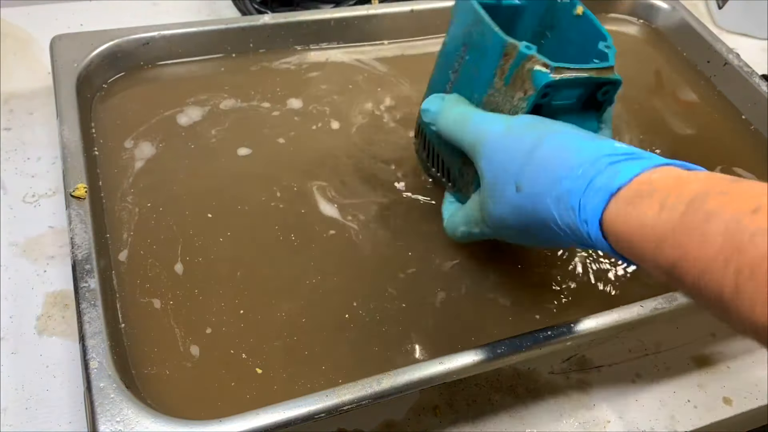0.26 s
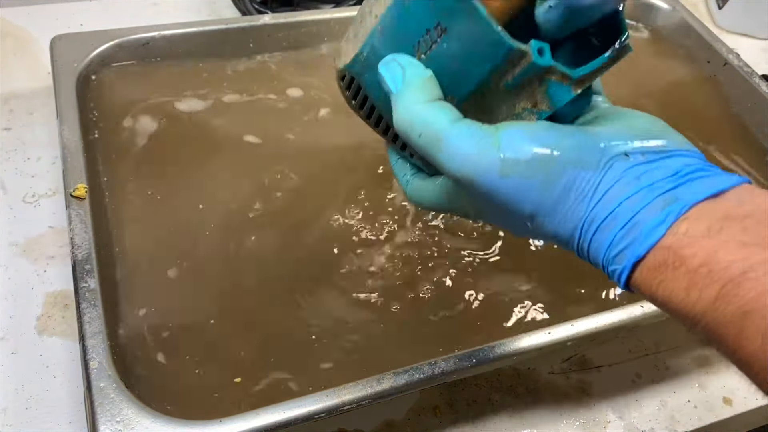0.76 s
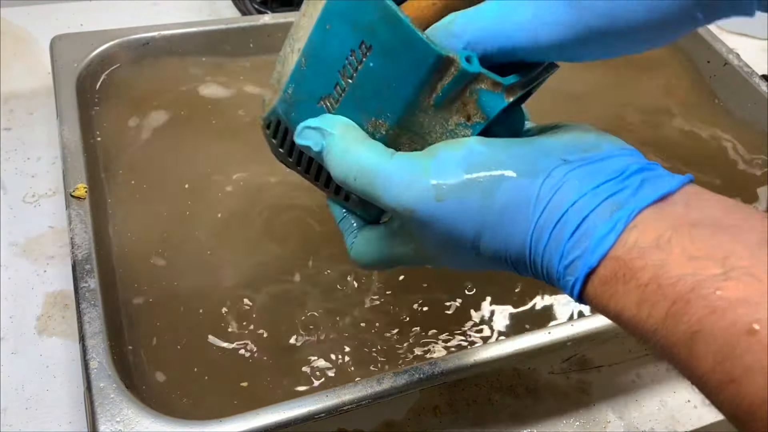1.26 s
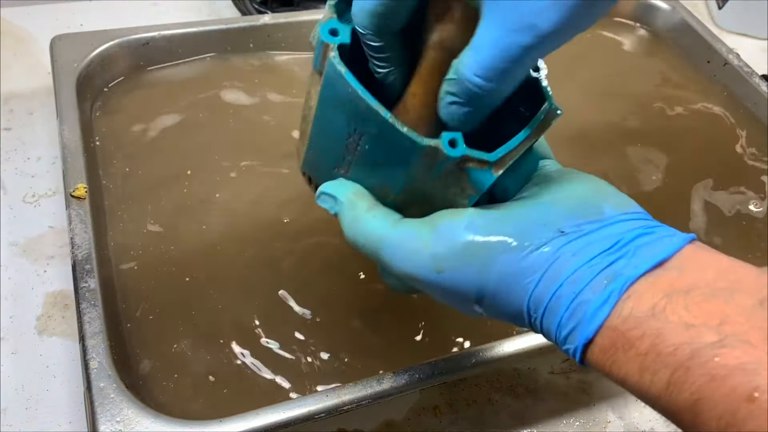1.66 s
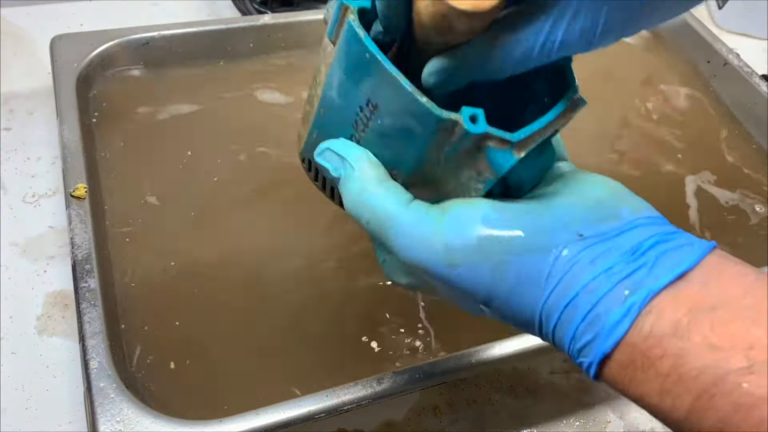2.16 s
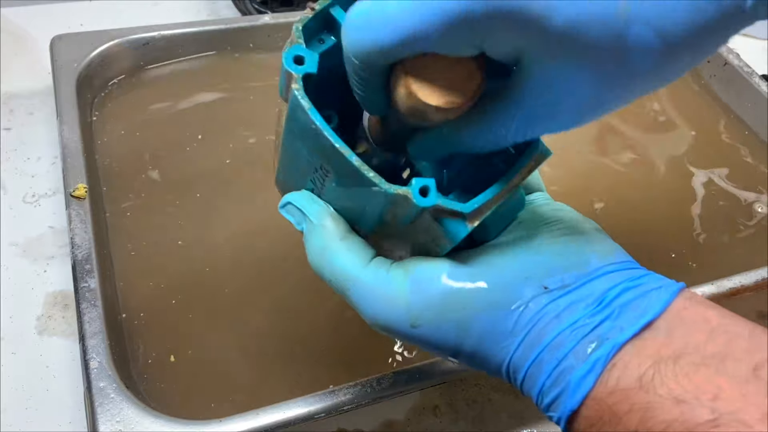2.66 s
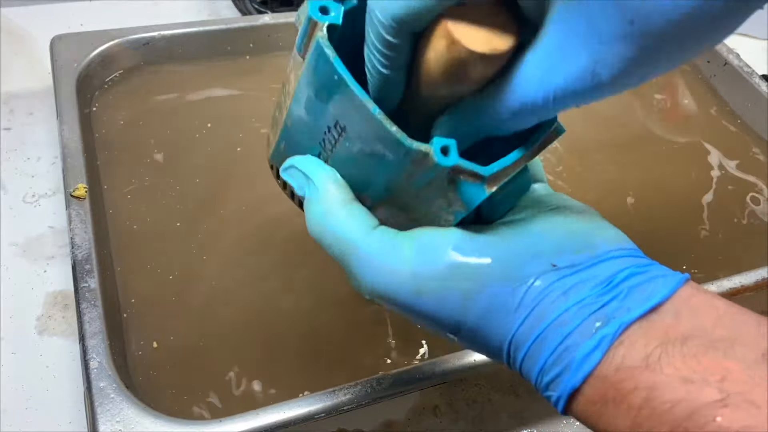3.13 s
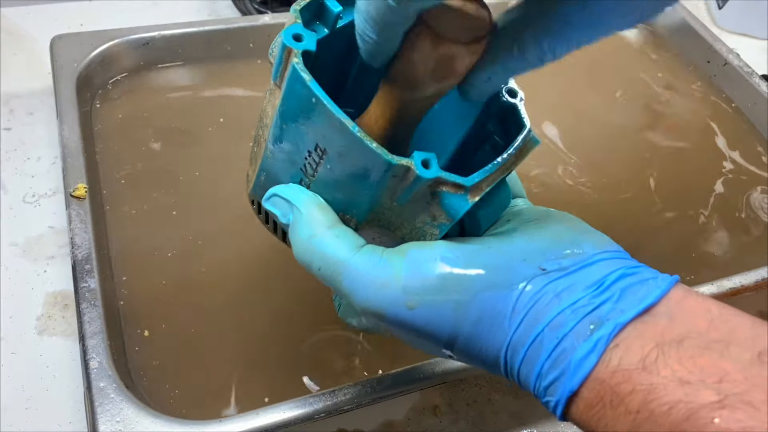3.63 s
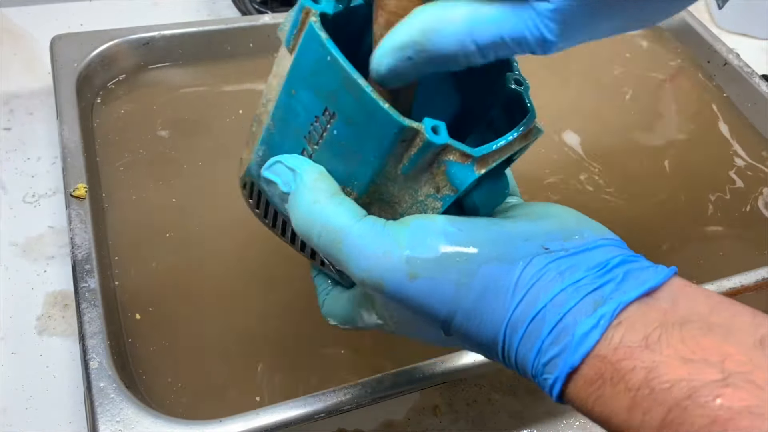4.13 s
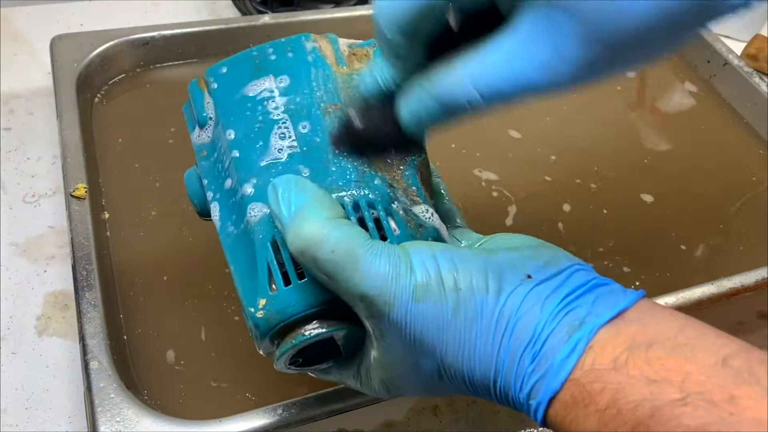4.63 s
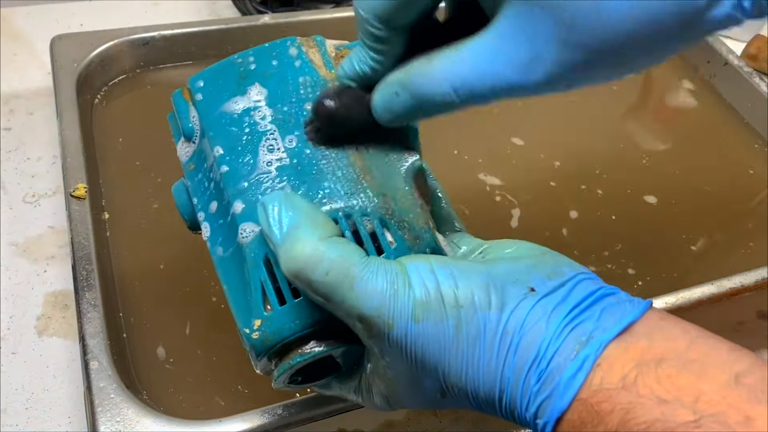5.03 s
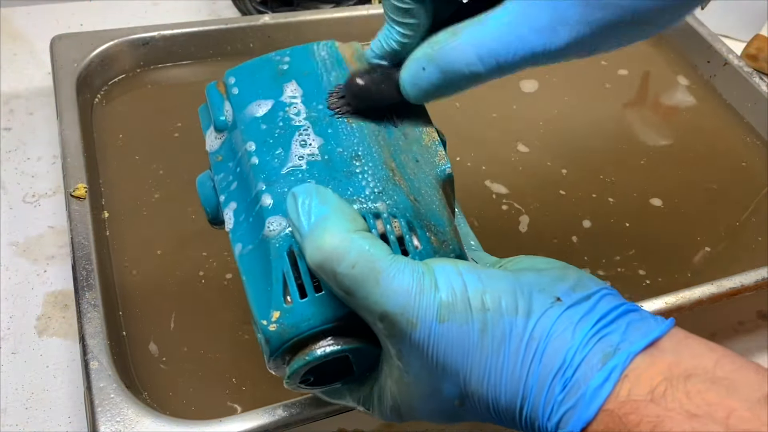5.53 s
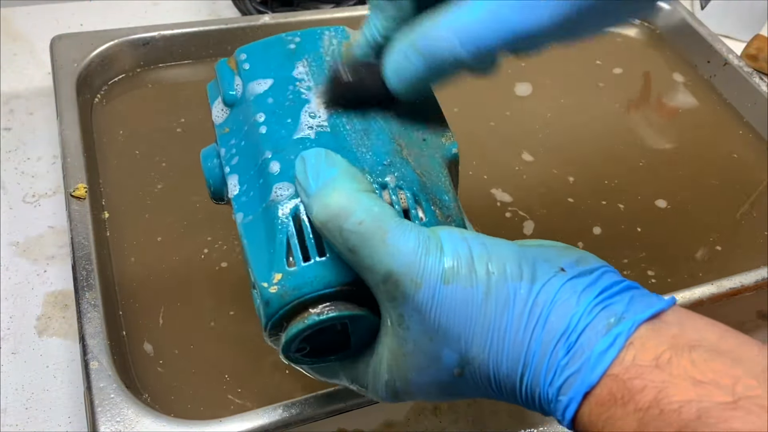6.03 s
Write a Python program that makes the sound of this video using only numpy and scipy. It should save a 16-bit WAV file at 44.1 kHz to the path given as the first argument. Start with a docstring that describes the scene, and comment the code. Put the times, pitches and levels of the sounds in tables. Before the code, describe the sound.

Close stereo pickup in a small hard room with a faint low hum. A hollow plastic housing clacks into a steel tray of water with a low boom and slosh, lifts out gurgling and dripping. A wet brush scrapes inside, its metal collar knocking the walls in short hollow clacks. After a quieter moment, brisk regular bristle strokes scrub the outside to the end.

```python
"""Small hard room with a low hum, heard at close range by two microphone ports.
A hollow plastic housing is dunked in a steel tray of water and lifted out, dripping: tray modes, bubbles, spray.
A wet brush works inside it: gritty bristle noise, and a ferrule that knocks the walls into short plastic modes.
It then scrubs the outside in quick strokes: bristle noise and wall resonances that follow the brush speed."""
import sys
import numpy as np
from scipy import signal
from scipy.fft import rfft, irfft, next_fast_len
from scipy.io import wavfile
from scipy.ndimage import uniform_filter1d

SR = 44100
rng = np.random.default_rng(int(sys.argv[2]) if len(sys.argv) > 2 else 0)


def store_pcm(level_fs):
    """Save levels as 16-bit WAV."""
    pcm = np.round(np.clip(level_fs, -1, 1) * 32767).astype(np.int16)
    wavfile.write(sys.argv[1], SR, np.atleast_2d(pcm).T)


N = 277389
TIME_S = np.arange(N) / SR
BIN_HZ = np.fft.rfftfreq(N, 1 / SR)
RING_S = np.arange(round(.3 * SR)) / SR  # time axis of one struck sound

# Background noise spectrum: freq_hz, level_db
FLOOR = [(50, -27), (105, -2.5), (260, -15.5), (340, -20.5), (1000, -34.5), (2300, -41), (7000, -38),
         (16000, -37)]
FLOOR_DB = -59.5
MAINS_HZ, MAINS_DB = 100, -67
# Rumble spectrum: freq_hz, level_db
RUMBLE = [(100, -19.5), (210, -2), (285, 2.5), (420, -20), (600, -14), (1500, -62)]
# Faint drifting tones: middle_s, half_length_s, level_db, pitch_hz, drift_hz_per_s
LOW_TONES = [(3.711, 0.056, -59, 241.5, 0), (3.856, 0.015, -54, 275, 0), (4.041, 0.19, -55.5, 179.8, -17),
             (4.19, 0.075, -61, 253.4, -330)]

# Room decay: freq_hz, t60_s
ROOM_DECAY = [(100, 0.36), (1500, 0.29), (8000, 0.32), (16000, 0.02)]
# Port phase: freq_hz, left_lead_rad
LEFT_LEAD = [(300, 0.63), (690, 0.78), (2150, 1.17), (3400, 1.5), (8000, 1)]
# Port level: freq_hz, left_minus_right_db
LEFT_LEVEL = [(600, -3), (2000, 0.5), (8000, 5), (13000, 3)]
PORT_LIKENESS = 0.92  # limit of the common power share toward high treble
LIMITER_CEILING, BAND_EDGE_HZ = .9, 16250

# Plunge into the tray
DUNK_S, DUNK_DB = .1455, -21
BOOM_HZ, BOOM_DB, BOOM_RISE_S, BOOM_T60_S = 239.3, -22.5, 0.015, 0.14
# Struck tray modes: freq_hz, level_db, t60_s
TRAY_MODES = [(770, -8, 0.03), (3850, 3, 0.02)]
# Water shoved about in the tray: freq_hz, width_hz, level_db
SLOSH = [(310, 220, 9), (570, 100, -6), (1250, 330, -10)]
# The housing breaks the surface and sucks in air
GULP_S, GULP_HALF_S, GULP_DB = .262, 0.0085, -30
# Gulp resonances: freq_hz, width_hz, level_db
GULP = [(3300, 480, 9), (1520, 700, 0.5)]

# Water thrown up by the plunge, then pouring off the lifted housing: start_s, rise_s, level_db, t60_s
GUSHES = [(0.142, 0.0021, -49.5, 0.26), (.24, 0.059, -51.5, 0.38)]
TRICKLE_DB, TRICKLE_DB_PER_S, TRICKLE_END_S = -56, -5, 1
# Drops slapping the water: start_s, level_db, pitch_hz
DROPS = [(0.231, -30.5, 1097), (0.42, -30.5, 4450), (0.477, -25.5, 5160), (0.541, -33, 2110),
         (0.559, -37, 2600), (0.621, -28.5, 7100), (0.667, -31, 6300), (0.784, -28, 3025),
         (0.7848, -31, 2350), (0.837, -25, 7380)]
# Bubbles welling up: start_s, level_db (before the chirp gain), pitch_hz
BUBBLES = [(.242, -42, 5600), (.270, -44, 1202), (.302, -39.5, 1576), (.365, -34, 3060), (0.386, -40, 3670),
           (.457, -44.5, 2500), (0.853, -40.5, 3310)]
# Spray spectrum: freq_hz, level_db
SPLASH = [(400, -18), (1400, -18), (5500, -7.5), (16000, -11.5)]

# Brush head bottoming in the housing: start_s, peak_db
THUDS = [(1.0805, -37.5), (1.384, -34), (2.095, -45.5), (2.1805, -23.5), (2.307, -37.5), (2.3577, -23),
         (2.421, -36), (2.488, -22.5), (2.6078, -23), (2.7383, -30.5)]
# Ferrule on wall: start_s, level_db, second_wall_mode_db, rim_db, hardness_db (last three relative)
KNOCKS = [(1.0802, -23, -1.5, -24, -4), (1.259, -51.5, 4, 1.5, -19), (1.385, -30, -3, -20, -11),
          (1.547, -46, -5, -3, -10), (1.713, -26.5, -2, -22, -9.5), (1.8961, -40, 5.5, 1, 11),
          (1.901, -40, -5, -4.5, 12.5), (1.9609, -28, -4.5, -13, -2), (2.1802, -33, -5, 4, 5),
          (2.2556, -34, 4, -25.5, -7), (2.358, -20.5, -3.5, -33, -2), (2.4871, -20, -0.5, -23, 0),
          (2.6069, -20.5, -1, -25.5, 1), (2.7375, -31, 3, -7, 1), (2.899, -38, -6.5, -12.5, -10.5),
          (3.083, -36.5, -6, -17, -14), (3.957, -60, -2, -8, -7)]
# Rim modes: freq_hz, level_db, t60_s
RIM_MODES = [(1010, 0, .034), (658, -9, .04)]
# Main wall modes: freq_hz, level_db, t60_s
WALL_MODES = [(1425, 0, .022), (1640, 3, .008)]
# Second wall modes: freq_hz, level_db, t60_s
SECOND_WALL_MODES = [(1850, 0, .014), (2170, -15, .018)]
# Shell modes: freq_hz, level_db, t60_s
SHELL_MODES = [(3180, -3, .016), (3700, -1, .016), (4350, -7, .012), (5060, -12, .011), (5500, -8, .009),
               (6600, 0, .007), (6950, -3, .007), (8600, -8, .009), (9600, -6, .008)]
# Walls ring longer near the free rim: rim share deep inside, and the rise that doubles the ring
DEEP_RIM_DB, RIM_DB_PER_DOUBLING = -26, 25
CRUSH_DB, CRUSH_S = -17, .007  # bristles crushed just before a knock

# Free sweeps inside the housing: middle_s, half_length_s, level_db
SWEEPS = [(.922, 0.0088, -43), (1.225, 0.032, -50.5), (1.478, 0.0095, -46.5), (2.094, 0.0093, -41.5),
          (2.862, 0.017, -47), (3.2, 0.04, -52), (3.305, 0.03, -50.5), (3.485, 0.019, -59),
          (3.755, 0.047, -55), (3.945, 0.021, -52.5), (4.01, 0.014, -70), (4.155, 0.022, -58),
          (4.25, 0.018, -56)]
# Run-up before each knock and pull-back after it; harder knocks come from faster strokes
RUN_UP_S, RUN_UP_HALF_S, RUN_UP_DB = 0.007, 0.021, -44
PULL_BACK_S, PULL_BACK_HALF_S, PULL_BACK_DB = 0.02, 0.057, -48.5
FIRM_KNOCK_DB, SPEED_DB_PER_DB = -18, 0.32
# Bristle noise lost per dB of positive hardness: the brightest knocks have little brush noise around them
BRIGHT_KNOCK_DB_PER_DB = 4.3
CATCH_HZ, CATCH_DB = 45, 2.8
# Bristle spectrum inside: freq_hz, level_db
INSIDE_COLOUR = [(500, -1.5), (1500, -20), (2600, -1), (3700, -5.5), (5000, -0.5), (7000, -1.5),
                 (16000, -5.5)]
# Hollow-body resonances: freq_hz, width_hz, level_db
CAVITY = [(1776, 540, 3), (3680, 100, -2), (6370, 410, -1.5)]

# Outside: a dab, the tuft resting on the wall, then strokes
DAB_S, DAB_HALF_S, DAB_DB = 4.367, 0.013, -38
PAUSE_DB = -57
# Strokes, each a push and a return: start_s
STROKES = [4.463, 4.527, 4.614, 4.701, 4.786, 4.868, 4.953, 5.035, 5.123, 5.212, 5.301, 5.397, 5.485, 5.573,
           5.656, 5.747, 5.837, 5.928, 6.014, 6.104, 6.194]
LAST_STROKE_S = 0.098  # duration
FIRST_STROKE_DB, EFFORT_DB = -42.5, -39.5
TURN_DB, MID_TURN_DB = -30, -15  # speed floor; added speed, greatest at the mid-stroke turn
# Tuft slapping an edge of the housing: start_s, level_db
SLAPS = [(4.538, -32.5), (4.625, -36.5), (4.958, -44), (6.119, -37.5)]
# Brush pressure on the outer wall: time_s, level_db
PRESS = [(4.4, -14), (4.8, -10.5), (5.0, -48), (5.3, -47), (5.42, -7), (5.75, -10), (6.1, -16.5)]
# Bristle spectrum outside: freq_hz, level_db
OUTSIDE_COLOUR = [(300, -10.5), (700, -12.5), (2400, -6.5), (3600, 2), (4700, -3), (6700, 0.5), (9000, 2),
                  (16000, 5)]
# Wall resonances woken by rubbing: freq_hz, width_hz, level_db
RUB = [(670, 170, -4.5), (1042, 20, 7.5), (1386, 140, 8), (1890, 330, 3)]
# Slots in the outer wall: freq_hz, width_hz, level_db
VENTS = [(3580, 240, 0)]
RUB_SPREAD_DB = 2.8
WANDER_TOP_HZ = 9100  # colour shifts shrink above this
# Low housing modes: freq_hz, width_hz, level_db
HOLLOW = [(238, 7.7, 0), (120.2, 6.8, 0)]
# Handling spectrum: freq_hz, level_db
HANDLING = [(20, -34), (90, 15), (200, -32), (600, -39.5)]
HUM_HZ, HUM_DB = 239.7, -60


def amp(db):
    """Decibels to gain."""
    return 10 ** (np.asarray(db) / 20)


def unit(x):
    """Scales to rms 1."""
    return x / np.sqrt(np.mean(x ** 2) + 1e-20)


def read(points, hz):
    """Joins spectrum points by straight lines over log frequency."""
    point_hz, value = np.transpose(points)
    return np.interp(np.log(hz + 1), np.log(point_hz + 1), value)


def add(mix, start_s, sound):
    """Mixes a sound in place at start_s."""
    part = mix[max(round(start_s * SR), 0):][:len(sound)]
    part += sound[:len(part)]


def coloured(x, points):
    """Filters x by a spectrum, at rms 1."""
    return unit(irfft(rfft(x) * amp(read(points, BIN_HZ)), N))


def resonant(x, peaks):
    """Passes x through parallel resonances, at rms 1."""
    response = 0
    for hz, width_hz, db in peaks:
        damping = 1j * BIN_HZ * width_hz
        response = response + amp(db) * damping / (hz ** 2 - BIN_HZ ** 2 + damping)
    return unit(irfft(rfft(x) * response, N))


def grit(rate_per_s, spread_db):
    """Tiny clicks of uneven size and either sign at random moments, at rms 1."""
    at = np.flatnonzero(rng.random(N) < rate_per_s / SR)
    size, chance = rng.random((2, N))[:, at]
    uneven = amp(spread_db * np.minimum(-np.log(1 - chance), 4.5))
    out = np.zeros(N)
    out[at] = (2 * size - 1) * uneven
    return unit(out)


def flicker(rate_hz, depth_db):
    """A gain that wanders at random, depth_db rms."""
    slow = irfft(rfft(rng.standard_normal(N)) * np.exp(-(BIN_HZ / rate_hz) ** 2), N)
    return amp(depth_db * unit(slow))


def swell(middle_s, half_s):
    """A bell-shaped rise and fall."""
    near = slice(*np.searchsorted(TIME_S, [middle_s - 5 * half_s, middle_s + 5 * half_s]))
    out = np.zeros(N)
    out[near] = np.exp(-((TIME_S[near] - middle_s) / half_s) ** 2)
    return out


def low_cut(x, hz=140):
    """Small sources radiate little deep bass."""
    return signal.sosfilt(signal.butter(2, hz, "high", fs=SR, output="sos"), x)


def wander(x, over_s=.04, across_hz=600, depth_db=2.4):
    """Shifts the colour at random in patches of time and frequency, at rms 1."""
    hz, frame_s, z = signal.stft(x, SR, nperseg=512)
    patches = uniform_filter1d(rng.standard_normal(z.shape), round(across_hz / hz[1]), axis=0)
    patches = unit(uniform_filter1d(patches, round(over_s / frame_s[1]), axis=1))
    shallower = 1 / (1 + (hz[:, None] / WANDER_TOP_HZ) ** 2)
    shifted = z * amp(depth_db * shallower * patches)
    return unit(signal.istft(shifted, SR, nperseg=512)[1][:N])


def ring(modes, longer=1, detune=0.02, uneven_db=2.5):
    """Dying modes, neighbours in opposite directions; each blow varies their pitch and level."""
    hz, db, t60_s = np.transpose(modes)[:, :, None]
    shift, size = rng.standard_normal((2, len(modes), 1))
    sign = (-1) ** np.arange(len(modes))[:, None]
    waves = sign * np.sin(2 * np.pi * hz * (1 + detune * shift) * RING_S)
    decay_db = -60 * RING_S / (t60_s * longer)
    return (amp(db + uneven_db * size + decay_db) * waves).sum(0)


def low_tone():
    """Faint low tones that swell, drift in pitch and flutter in strength."""
    tones = np.zeros(N)
    for middle_s, half_s, db, hz, hz_per_s in LOW_TONES:
        since = TIME_S - middle_s
        turns = since * (hz + hz_per_s * since / 2)
        tones += amp(db) * swell(middle_s, half_s) * np.sin(2 * np.pi * turns)
    return np.sqrt(2) * tones * flicker(16, 2)


def background(side_db=-16, rumble_db=-56):
    """Room noise, mains hum, and a soft rumble that swells with the low tones."""
    mid, side = (coloured(rng.standard_normal(N), FLOOR) for _ in range(2))
    noise = amp(FLOOR_DB) * (mid + amp(side_db) * np.array([side, -side]))
    mains = amp(MAINS_DB) * np.sqrt(2) * np.sin(2 * np.pi * MAINS_HZ * TIME_S)
    rumble = amp(rumble_db) * swell(3.907, 0.13) * coloured(rng.standard_normal(N), RUMBLE)
    return noise + mains + rumble + low_tone()


def room(x, first_s=0.0058, change_hz=2.7, mono_hz=600, count=3):
    """Diffuse two-channel tails decaying by frequency; several cross-fade so the reverberation varies."""
    tap_s = np.arange(SR // 2) / SR
    taps = rng.standard_normal((count, 2, SR // 2)) * (tap_s > first_s)
    hz, frame_s, z = signal.stft(taps, SR, nperseg=256)
    z[:, 1] += (z[:, 0] - z[:, 1]) * np.exp(-(hz[:, None] / mono_hz) ** 2)  # bass alike at both ports
    decay = amp(-60 * frame_s / read(ROOM_DECAY, hz)[:, None])
    tails = signal.istft(z * decay, SR, nperseg=256)[1]
    turn = change_hz * TIME_S - np.arange(count)[:, None] / count
    shares = np.maximum(np.cos(2 * np.pi * turn), 0)
    shares /= np.linalg.norm(shares, axis=0)
    out = np.zeros((2, N))
    for share, tail in zip(shares, tails):
        tail = tail / np.linalg.norm(tail[0])
        out += signal.oaconvolve((x * share)[None], tail, axes=1)[:, :N]
    return out


def ports(x, scatter_s=0.0024, apart_hz=5000):
    """Two ports differ in phase and level; near reflections part them in the treble."""
    size = next_fast_len(N + len(RING_S))
    hz = np.fft.rfftfreq(size, 1 / SR)
    half = amp(read(LEFT_LEVEL, hz) / 2) * np.exp(.5j * read(LEFT_LEAD, hz))
    near = rng.standard_normal(len(RING_S)) * np.exp(-RING_S / scatter_s)
    near = rfft(near / np.linalg.norm(near), size) * np.array([[1], [-1]])
    same = 1 - (1 - PORT_LIKENESS) * hz ** 2 / (hz ** 2 + apart_hz ** 2)
    response = np.array([half, 1 / half]) * np.sqrt(same) + np.sqrt(1 - same) * near
    return irfft(rfft(x, size) * response, size)[:, :N]


def plunge(slosh_db=-30, slosh_t60_s=0.2):
    """The housing clacks into the water and shoves it aside; the tray booms; air is gulped."""
    since = np.maximum(RING_S - BOOM_RISE_S, 0)
    rise = np.sqrt(np.minimum(RING_S / BOOM_RISE_S, 1))
    boom = rise * amp(BOOM_DB - 60 * since / BOOM_T60_S) * np.sin(2 * np.pi * BOOM_HZ * RING_S)
    slosh_noise = resonant(rng.standard_normal(N), SLOSH)[:len(RING_S)]
    slosh = amp(slosh_db - 60 * RING_S / slosh_t60_s) * slosh_noise
    out = amp(GULP_DB) * swell(GULP_S, GULP_HALF_S) * resonant(rng.standard_normal(N), GULP)
    add(out, DUNK_S, amp(DUNK_DB) * ring(TRAY_MODES) + boom + slosh)
    return out


def bubble(hz, t60_s, glide, rise_s):
    """A pocket of air rings and rises in pitch as it nears the surface."""
    t = RING_S[RING_S < t60_s]
    wave = np.sin(2 * np.pi * hz * t * (1 + glide * t / t60_s))
    return wave * amp(-60 * t / t60_s) * (1 - np.exp(-t / rise_s))


def spray(over_s=.009, across_hz=800, depth_db=6):
    """Tiny splashes with brief, random colours."""
    return wander(coloured(grit(7000, 2.2), SPLASH), over_s, across_hz, depth_db)


def flow(stop_s=0.044, uneven_db=3):
    """Strength of running water: gushes that die away, then a thinning, uneven trickle."""
    gushes = np.zeros(N)
    for s, rise_s, db, t60_s in GUSHES:
        rise = np.clip((TIME_S - s) / rise_s, 0, 1)
        gushes += rise * amp(db - 60 * np.maximum(TIME_S - s - rise_s, 0) / t60_s)
    since = TIME_S - GUSHES[-1][0]
    stop = np.clip((TRICKLE_END_S - TIME_S) / stop_s, 0, 1)
    trickle = (since > 0) * amp(TRICKLE_DB + TRICKLE_DB_PER_S * since) * stop
    return gushes + trickle * flicker(69, uneven_db)


def water(cycles=32, drop_cycles=55, chirp_cycles=85, chirp_db=7.5, slap_db=-8, slap_t60_s=0.022, count=30):
    """A trickle of small bubbles and spray, larger chirping bubbles, and drops that slap and ring."""
    fizz = np.zeros(N)
    for hz in np.geomspace(1400, 8500, count):
        pop = unit(bubble(hz, cycles / hz, .3 * rng.random(), .0007)) * np.sqrt(hz)
        fizz += signal.oaconvolve(grit(90, 3.5), pop)[:N]
    rings, slaps = np.zeros((2, N))
    for s, db, hz in BUBBLES:
        chirp = bubble(hz, chirp_cycles / hz, glide=0.34, rise_s=0.00048)
        add(rings, s, amp(db + chirp_db) * chirp)
    for s, db, hz in DROPS:
        add(rings, s, amp(db) * bubble(hz, drop_cycles / hz, glide=0.134, rise_s=0.00017))
        add(slaps, s, amp(db + slap_db - 60 * RING_S / slap_t60_s))
    running = (unit(fizz) + amp(-2) * spray()) * flow()
    return rings * flicker(350, 3) + running + slaps * spray()


def thuds(top_hz=950, end_hz=90, fall_s=0.0046, swell_s=0.002):
    """Dull wet thuds fall quickly in pitch, since slow bending waves arrive last."""
    turns = end_hz * RING_S + (top_hz - end_hz) * fall_s * (1 - np.exp(-RING_S / fall_s))
    envelope = RING_S / swell_s * np.exp(1 - RING_S / swell_s)
    thud = np.sin(2 * np.pi * turns) * envelope
    out = np.zeros(N)
    for s, db in THUDS:
        add(out, s, amp(db) * thud)
    return out


def blow(x):
    """Scales a ring so that its energy spread over 22 ms has rms 1."""
    return x / np.sqrt(np.sum(x ** 2) / (.022 * SR))


def chatter(x, share=.2, within_s=.0012, count=3):
    """The ferrule touches again within an instant, which colours each knock differently."""
    out = x.copy()
    for late, size in rng.random((count, 2)):
        add(out, within_s * late, share * (2 * size - 1) * x)
    return out


def knocks(shell_db=-1, tick_db=-9, tick_t60_s=0.022, tick_hz=9000, rise_s=0.00038):
    """Bristles crush, then the ferrule hits the wall: short plastic modes and a bright tick."""
    out, crush = np.zeros((2, N))
    onset = 1 - np.exp(-RING_S / rise_s)
    treble = signal.butter(1, [tick_hz, SR / 3], "band", fs=SR, output="sos")
    for s, db, second_db, rim_db, hard_db in KNOCKS:
        longer = 2 ** ((rim_db - DEEP_RIM_DB) / RIM_DB_PER_DOUBLING)
        tick = rng.standard_normal(len(RING_S)) * amp(-60 * RING_S / tick_t60_s)
        parts = [(ring(WALL_MODES, longer), 0),
                 (ring(SECOND_WALL_MODES), second_db),
                 (ring(RIM_MODES), rim_db),
                 (ring(SHELL_MODES, longer), hard_db + shell_db),
                 (signal.sosfilt(treble, tick), hard_db + tick_db)]
        knock = sum(amp(part_db) * blow(x * onset) for x, part_db in parts)
        add(out, s, amp(db) * chatter(knock))
        add(crush, s - RING_S[-1], amp(db + CRUSH_DB) * np.exp(-RING_S[::-1] / CRUSH_S))
    return out + crush * coloured(rng.standard_normal(N), INSIDE_COLOUR)


def brush_inside(cavity_db=-4.0):
    """Wet bristles sweep the inner walls, catching and slipping, and wake the hollow body."""
    sweeps = list(SWEEPS)
    for s, db, _, _, hard_db in KNOCKS:
        speed_db = SPEED_DB_PER_DB * (db - FIRM_KNOCK_DB)
        level_db = speed_db - BRIGHT_KNOCK_DB_PER_DB * max(hard_db, 0)
        sweeps.append((s - RUN_UP_S, RUN_UP_HALF_S, RUN_UP_DB + level_db))
        sweeps.append((s + PULL_BACK_S, PULL_BACK_HALF_S, PULL_BACK_DB + level_db))
    power = sum(amp(2 * db) * swell(s, half_s) for s, half_s, db in sweeps)
    hiss = coloured(grit(9000, 0.53), INSIDE_COLOUR)
    body = wander(resonant(grit(2200, 3.8), CAVITY))
    return np.sqrt(power) * flicker(CATCH_HZ, CATCH_DB) * (hiss + amp(cavity_db) * body)


def scrubbing(skew=0.94, sharpness=0.87, back_db=-3.0, bite_db=4, bite_turns=0.085, slap_t60_s=0.053):
    """Outside stroke strength, biting at the start and nearly stopping at the end; flags the return."""
    starts_and_end = np.append(STROKES, STROKES[-1] + LAST_STROKE_S)
    cycles = np.interp(TIME_S, starts_and_end, np.arange(len(STROKES) + 1))
    phase = cycles % 1
    back = phase > .5
    speed = abs(np.sin(np.pi * (2 * phase % 1) ** skew)) ** sharpness
    speed += amp(TURN_DB) + amp(MID_TURN_DB) * np.sin(np.pi * phase)
    effort_db = np.where(cycles < 1, FIRST_STROKE_DB, EFFORT_DB)
    bite = bite_db * np.exp(-(phase / bite_turns) ** 2)
    strength = (TIME_S > STROKES[0]) * speed * amp(effort_db + back_db * back + bite)
    strength += amp(DAB_DB) * swell(DAB_S, DAB_HALF_S)
    strength += amp(PAUSE_DB) * (TIME_S > DAB_S) * (TIME_S < STROKES[0])
    for s, db in SLAPS:
        add(strength, s, amp(db - 60 * RING_S / slap_t60_s))
    return strength, back


def hollow(strength, ringing_db=-66, handling_db=-73):
    """Strokes drive the housing's low modes and shake it in the hand, over a wavering hum."""
    drive = strength * rng.standard_normal(N)
    hum = amp(HUM_DB) * np.sqrt(2) * np.sin(2 * np.pi * HUM_HZ * TIME_S) * flicker(11, 1.05)
    ringing = amp(ringing_db) * resonant(drive, HOLLOW)
    handling = amp(handling_db) * coloured(drive, HANDLING)
    fade_in = np.clip((TIME_S - DAB_S) / DAB_HALF_S + 1, 0, 1)
    return (hum + ringing + handling) * fade_in


def brush_outside(strength, back, hiss_db=4.0, return_db=-6, vents_db=-9):
    """Bristle noise follows the brush speed; the return stroke presses less on the wall."""
    hiss = amp(hiss_db) * wander(coloured(grit(16000, 2.23), OUTSIDE_COLOUR))
    pressure = amp(np.interp(TIME_S, *np.transpose(PRESS)))
    rub = pressure * wander(resonant(grit(1100, RUB_SPREAD_DB), RUB)) * flicker(27, 0.81)
    slots = wander(resonant(grit(1100, RUB_SPREAD_DB), VENTS))
    vents = amp(vents_db) * swell(5.05, 0.36) * slots  # the tuft crosses the slots
    return strength * (hiss + (rub + vents) * amp(return_db * back)) * flicker(37, 1.0)


def scene(spread_db=-12):
    """Sums sources, direct and through the room; the wide tuft differs a little at each port."""
    strength, back = scrubbing()
    plastic = low_cut(knocks() + brush_inside() + brush_outside(strength, back))
    wet = thuds() + low_cut(plunge() + water())
    direct = ports(plastic + wet + hollow(strength))
    spread = amp(spread_db) * low_cut(brush_outside(strength, back))
    reverb = room(amp(-15.5) * plastic + amp(-14.0) * wet)
    return direct + np.array([spread, -spread]) + reverb + background()


def record(dry):
    """Rounds off the highest peaks, then limits the band."""
    rounded = dry / (1 + (dry / LIMITER_CEILING) ** 6) ** (1 / 6)
    low_pass = signal.firwin(511, BAND_EDGE_HZ, window=("kaiser", 9), fs=SR)
    return signal.oaconvolve(rounded, low_pass[None], "same")


dry = scene()
out = record(dry)
store_pcm(out)
```